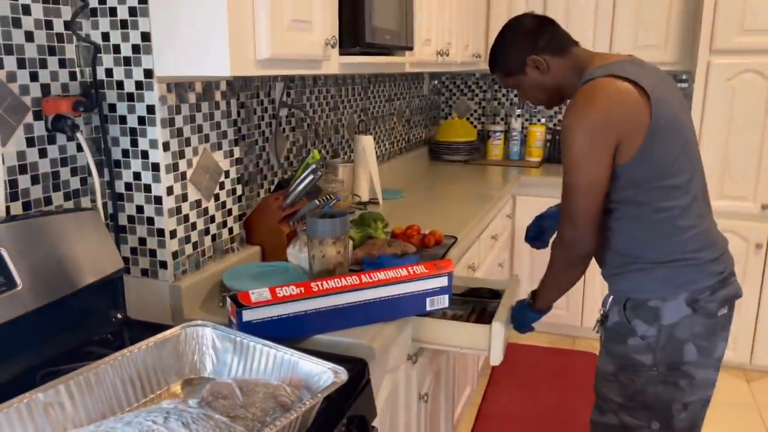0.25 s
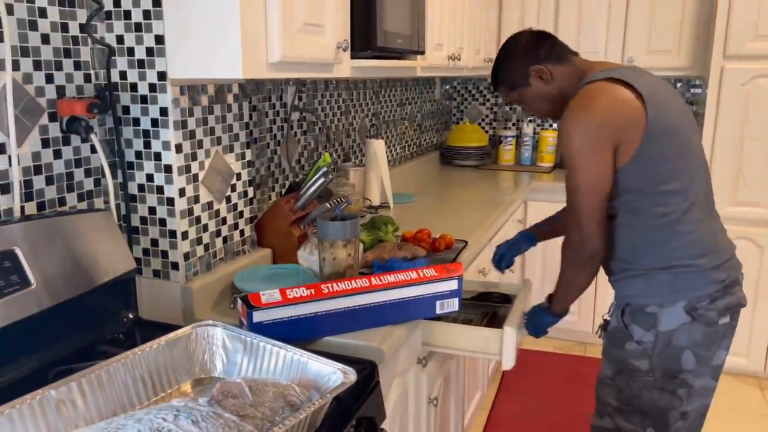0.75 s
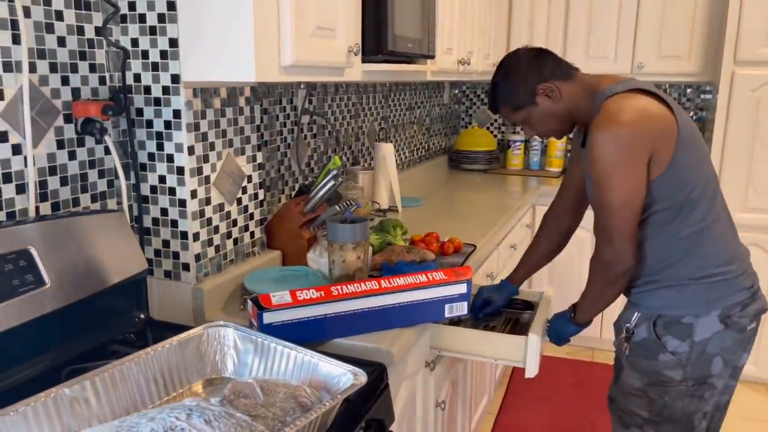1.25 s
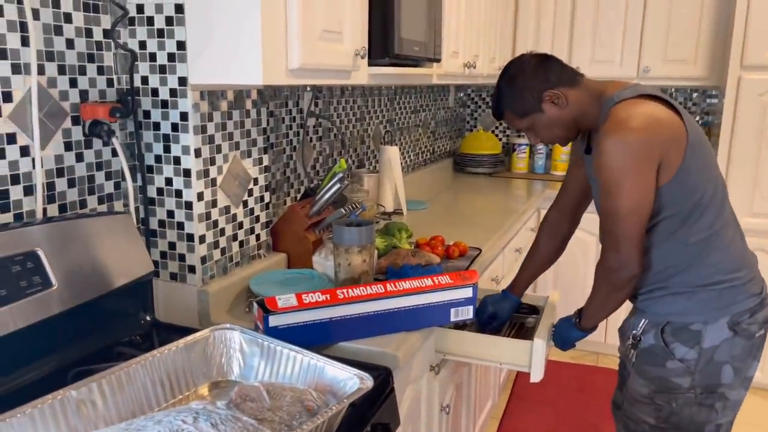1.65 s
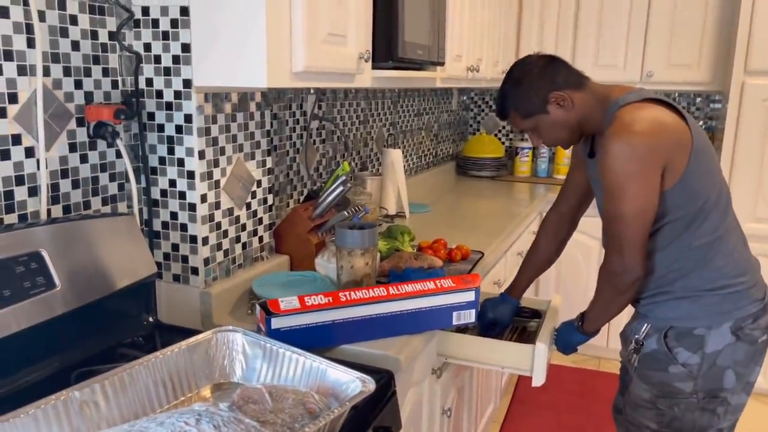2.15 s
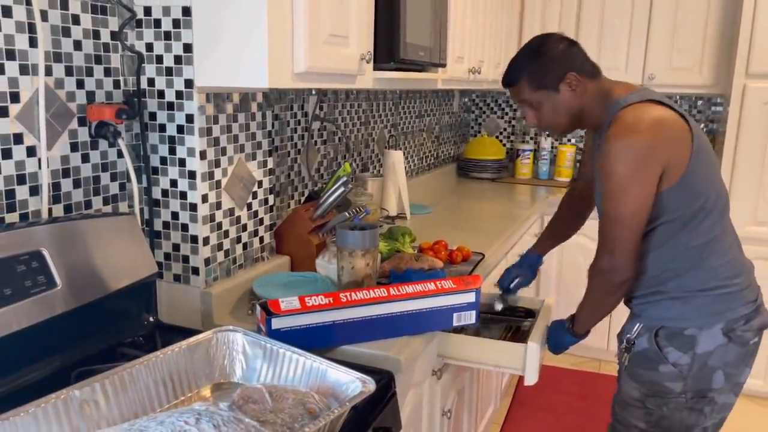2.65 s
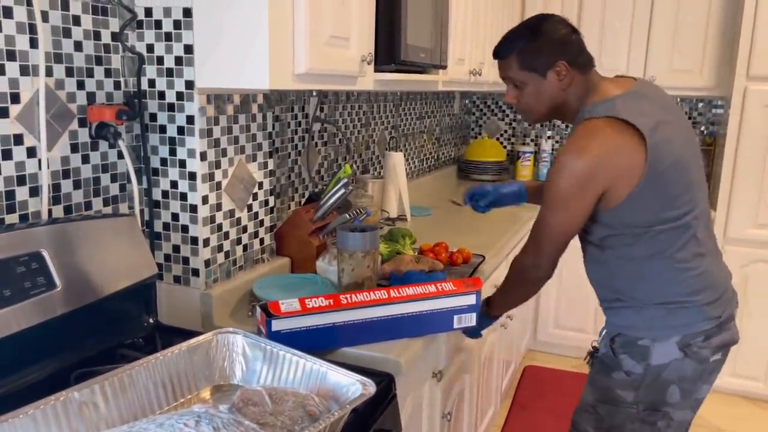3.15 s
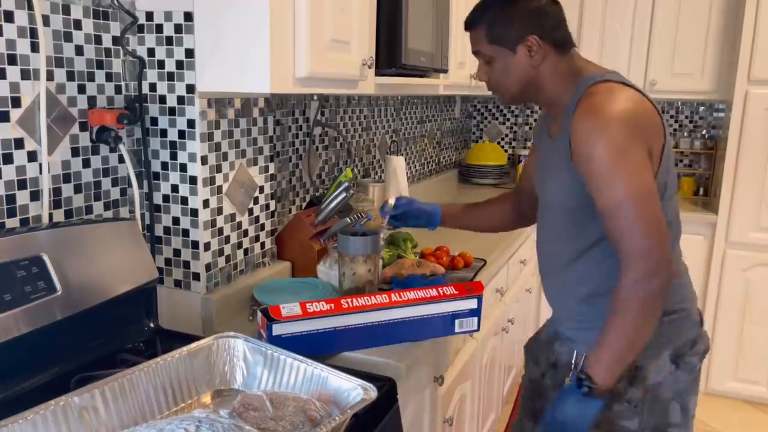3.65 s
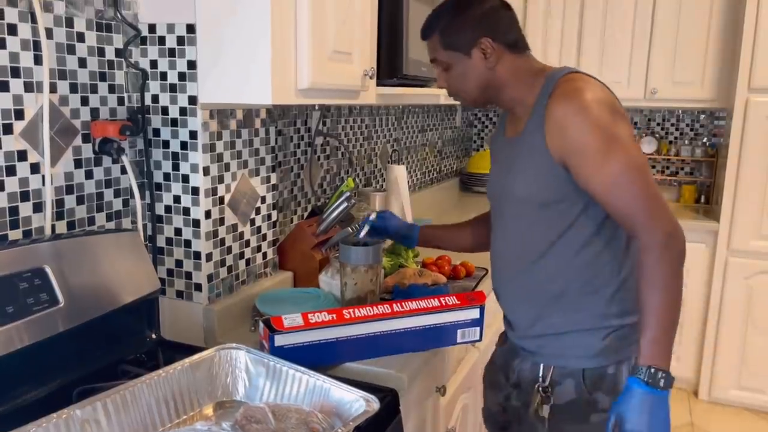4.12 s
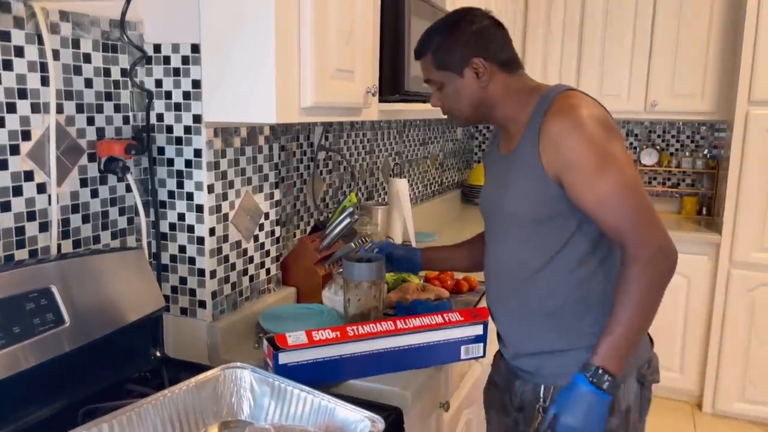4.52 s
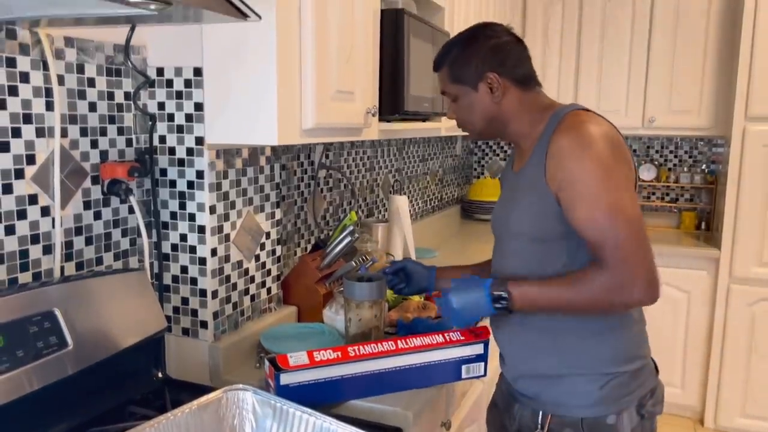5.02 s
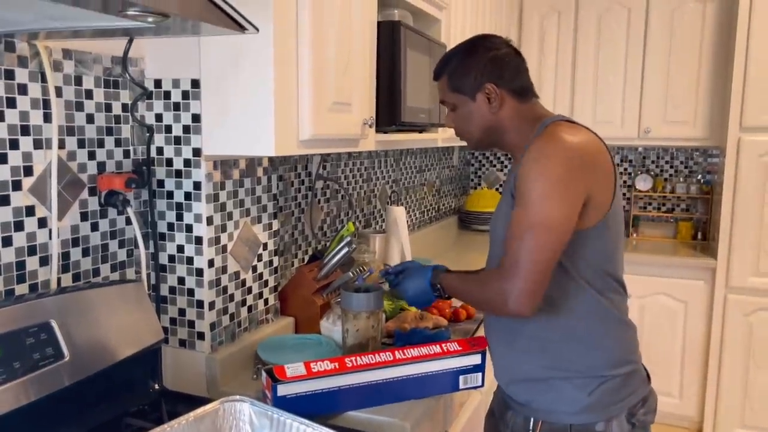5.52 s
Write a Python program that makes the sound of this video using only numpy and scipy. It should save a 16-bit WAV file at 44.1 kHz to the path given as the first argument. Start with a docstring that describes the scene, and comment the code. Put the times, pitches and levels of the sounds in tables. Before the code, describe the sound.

A wooden drawer opens, cutlery clinks, the drawer slams shut, and a spoon taps a jar in an echoing kitchen.

```python
"""A wooden cutlery drawer, heard from within a tiled kitchen on a closely spaced stereo microphone.
It is pulled open, wood rubbing on wood, and a gloved hand rummages through the clinking steel in its tray.
A spoon is drawn out ringing, the drawer rolls back and slams, then the spoon taps a blender jar's rim,
a little further left. Soft steps and rustling clothes follow. The tiles echo; an appliance hums."""
import sys
import numpy as np
from scipy import signal
from scipy.fft import rfft, irfft
from scipy.io import wavfile
from scipy.ndimage import uniform_filter1d

SR = 44100
rng = np.random.default_rng(int(sys.argv[2]) if len(sys.argv) > 2 else 0)


def put_to_file(sound):
    """Save the sound as 16-bit audio at rate SR, in the file named by the first command-line argument."""
    columns = np.atleast_2d(sound).T  # one column per channel
    safe = np.clip(columns, -1, 1)
    whole_steps = np.round(safe * 32767)
    wavfile.write(sys.argv[1], SR, whole_steps.astype(np.int16))


N = 254888
TIME = np.arange(N) / SR


def from_db(db):
    """Decibels to gain."""
    return 10 ** (np.asarray(db) / 20)


def rms_one(x):
    """Scale to unit rms."""
    return x / np.sqrt(np.mean(x ** 2) + 1e-20)


def at_hz(points, hz):
    """Read a table along a log-frequency axis."""
    f, value = np.transpose(points)
    return np.interp(np.log(np.maximum(hz, 1)), np.log(f), value)


def bins(x):
    """Frequencies of the spectrum of x."""
    return np.fft.rfftfreq(x.shape[-1], 1 / SR)


def coloured(x, spectrum):
    """Give a noise its colour, at unit rms."""
    return rms_one(irfft(rfft(x) * from_db(at_hz(spectrum, bins(x))), x.shape[-1]))


def with_cluster(spectrum, pitch_hz, height_db, width_hz):
    """A colour with one cluster of close modes standing out."""
    grid = np.geomspace(40, 20000, 500)
    return np.c_[grid, at_hz(spectrum, grid) + height_db / (1 + ((grid - pitch_hz) / width_hz) ** 2)]


def drift(per_s):
    """A random wander with a spread near 1."""
    return np.interp(TIME * per_s, np.arange(2000), rng.standard_normal(2000))


def swell(start_s, length_s, db, rise_db_per_s, fall_db_per_s):
    """Gain of one movement: it swells, holds its level and dies away."""
    early, late = np.maximum(start_s - TIME, 0), np.maximum(TIME - start_s - length_s, 0)
    return from_db(db - np.minimum(rise_db_per_s * early + fall_db_per_s * late, 120))


def add(track, s, sound, db):
    """Lay a sound into a track, scaled by the rms of its first 10 ms."""
    start = round(s * SR)
    head = np.sqrt(np.mean(sound[:SR // 100] ** 2))
    track[start:start + len(sound)] += (from_db(db) / head * sound)[:N - start]


def burst(spectrum, t60, rise_s=1e-6):
    """A blow on a body with countless close modes: a crack in its colour; a soft contact builds up."""
    t = TIME[:2 ** 14]
    first_half = t < t[-1] / 2
    attack = 1 - np.exp(-(t + 1 / SR) / rise_s)
    noise_spectrum = rfft(rng.standard_normal(len(t)) * from_db(-60 * t / t60))
    crack = irfft(noise_spectrum / np.abs(noise_spectrum)) * first_half * attack
    # minimum phase: nothing sounds before the blow
    cepstrum = irfft(np.log(from_db(at_hz(spectrum, bins(t)))))
    body = np.exp(rfft(cepstrum * np.sign(t) * 2 * first_half))
    return irfft(rfft(crack) * body)


def ring(hz, db, t60, size=SR // 2):
    """A few distinct modes started by a blow, each of either sign."""
    t = TIME[:size, None]
    return (np.sin(2 * np.pi * hz * t) * from_db(db - 60 * t / t60)) @ rng.choice([-1, 1], len(hz))


# motor tones, centred between the channels: f/Hz, level/dB, waver/dB
MOTOR_TONES = [(45.8, -43, .5), (57.3, -50, .8), (91, -55, 1.5), (95, -56, 1.5), (181, -62.5, 2),
               (266, -59.5, 2), (271.5, -58, 2), (355, -71, 2), (415, -68, 3), (533, -72, 3), (799, -73, 3)]
def appliance(wander_rad=0.2):
    """Two nearly steady motor tones hum under wavering overtones."""
    out = np.zeros(N)
    for hz, db, waver_db in MOTOR_TONES:
        gain = np.sqrt(2) * from_db(db + waver_db * drift(3.71))
        phase = 2 * np.pi * (hz * TIME + rng.random()) + wander_rad * drift(3.52)
        out += gain * np.sin(phase)
    return out


# the cook shifts about at the counter: t/s, length/s, level/dB
RUSTLES = [(0, 1, -60.5), (2.01, 1.5, -63), (3.496, 2.16, -61)]
# colour of the cloth: f/Hz, level/dB
CLOTH = [(500, -33.5), (1800, 12), (3200, 1.5), (5000, 0.5), (9000, 2), (11300, 1.5), (12500, -71.5)]
def clothes(fade_db_per_s=17.5):
    """Cloth brushes on cloth: a faint, wide hiss that comes and goes."""
    moves = [swell(s, length, db, fade_db_per_s, fade_db_per_s) for s, length, db in RUSTLES]
    return np.max(moves, axis=0) * coloured(diffuse(N), CLOTH)


# colour of the air all round the microphone: f/Hz, level/dB
AIR = [(25, -25), (38, -13.5), (60, 1.5), (80, -3), (140, -4), (270, -8), (380, -15), (550, -16),
       (900, -22.5), (1900, -28.5), (3300, -39), (9000, -48.5), (11300, -60), (12500, -67.5)]
def room_tone(db=-45.5):
    """A low, steady rush of air."""
    return from_db(db) * coloured(diffuse(N), AIR)


# colour of the drawer's wood: f/Hz, level/dB
WOOD = [(60, -3.5), (150, -7), (240, -0.5), (330, 8), (480, -4), (900, -1.5), (1500, -5), (2100, -6),
        (3000, -14.5), (4200, -17.5), (5500, -19.5), (9000, -19.5), (15000, -62)]
# colour of the heaped cutlery: f/Hz, level/dB
STEEL = [(1000, -5.5), (3000, -6.5), (4400, -5), (6000, -5), (7500, -3), (9000, 6), (10000, -2),
         (11200, 6.5), (12000, -3), (12800, -18), (14500, -15), (15400, -32)]
# pulls, pushes and sweeps of the hand through the tray: t/s, length/s, wood level/dB, steel level/dB
STROKES = [(0.014, 0.022, -44, -48.5), (0.484, 0.033, -59, -60.5), (0.608, 0.052, -45, -45.5),
           (0.738, 0.12, -55, -59), (0.907, 0.095, -47.5, -46), (1.957, 0.048, -47.5, -47.5),
           (2.17, 0.046, -51, -55), (2.323, 0.14, -43, -38), (2.783, 0.083, -46, -55),
           (2.956, 0.13, -40, -50)]
def sliding(rise_db_per_s=247, stop_db_per_s=338):
    """Every stroke rubs wood on wood and drags the cutlery over itself."""
    wood = sum(swell(s, length, db, rise_db_per_s, stop_db_per_s) for s, length, db, _ in STROKES)
    steel = sum(swell(s, length, db, rise_db_per_s, stop_db_per_s) for s, length, _, db in STROKES)
    wood *= rubbing(WOOD, per_s=1800, uneven_db=1.0)
    steel *= rubbing(STEEL, per_s=870, uneven_db=-1.5)
    return wood + steel


def rubbing(spectrum, per_s, uneven_db):
    """Friction is a stream of tiny slips of wavering strength."""
    slips = (rng.random(N) < per_s / SR) * rng.standard_normal(N)
    return coloured(slips * from_db(uneven_db * drift(70)), spectrum)


# knocks from inside the drawer: t/s, level/dB, hollow resonance f/Hz, its height/dB, rise/s
KNOCKS = [(0.0194, -34.5, 1880, 6, .0003), (.025, -36, 1470, 16, .0003), (.366, -46, 1600, 7, .003),
          (.383, -49, 1450, 4, 0.0036), (.546, -45.5, 1500, 15, .0005), (.659, -49.5, 1000, 5, 0.0028),
          (.746, -49.5, 1300, 4, .004), (.886, -41, 2100, 5, .003), (.901, -46.5, 1700, 3, 0.0054),
          (1.715, -50.5, 1510, 6, 0.0052), (1.729, -53, 1300, 3, 0.0052), (1.994, -45.5, 1204, 7, .004),
          (2.335, -42.5, 850, 11, .004), (2.385, -42.5, 327, 5, .003), (2.403, -36.5, 1197, 4, .003),
          (2.427, -39, 1150, 6, .003), (2.645, -48.5, 1486, 6, .003), (2.672, -45, 1210, 5, .003),
          (2.690, -49.5, 1400, 4, .005), (3.048, -39, 1517, 4, 0.0059), (3.072, -41.5, 1300, 5, 0.0055)]
def drawer_knocks(t60=0.052, hollow_width_hz=160, rebound_s=0.028, rebound_db=-10.5):
    """Each knock sounds the hollow tray, which falls back once, softer."""
    out = np.zeros(N)
    for s, db, hz, hollow_db, rise_s in KNOCKS:
        hollow = with_cluster(WOOD, hz, hollow_db, hollow_width_hz)
        add(out, s, burst(hollow, t60, rise_s), db)
        add(out, s + rebound_s * rng.uniform(.85, 1.15), burst(WOOD, t60, rise_s), db + rebound_db)
    return out


# brief scrapes and swishes: t/s, length/s, level/dB, start f/Hz, end f/Hz, half width/Hz
SWISHES = [(.192, 0.0181, -44, 1420, 950, 220), (4.769, 0.06, -61.5, 2400, 2300, 200),
           (4.935, 0.08, -61, 9300, 8000, 700), (5.081, 0.085, -64, 6200, 5750, 450)]
def swishes(rasp_db=3):
    """Each scrape is a narrow, rasping band of noise that falls in pitch."""
    out = np.zeros(N)
    for s, length, db, start_hz, end_hz, width_hz in SWISHES:
        hz = np.interp(TIME, [s, s + length], [start_hz, end_hz])
        gain = swell(s, length, db, rise_db_per_s=800, fall_db_per_s=350)
        rasp = from_db(rasp_db * drift(120))
        band = signal.sosfilt(signal.butter(2, width_hz, fs=SR, output="sos"), rng.standard_normal(N))
        out += gain * rasp * rms_one(band * np.cos(2 * np.pi * np.cumsum(hz) / SR))
    return out


# steel touching steel down in the tray: t/s, level/dB, cluster f/Hz, its width/Hz
CLINKS = [(0.335, -45.5, 7000, 302), (.587, -55, 9300, 340), (0.618, -41, 8140, 340),
          (0.634, -40, 12000, 340), (.651, -44, 7400, 340), (.701, -44.5, 4220, 600),
          (.703, -46, 7160, 300), (0.708, -41, 9100, 340), (0.917, -44, 11700, 340),
          (0.971, -47, 8400, 342), (1.679, -52, 10600, 340), (1.954, -51, 11260, 340),
          (2.181, -44, 9200, 340), (2.293, -36, 11100, 340), (2.336, -30, 11070, 300),
          (2.396, -20, 9280, 220), (2.403, -21.5, 11130, 300), (2.422, -25, 11700, 300)]
def cutlery(crack_t60=0.03, stray_count=10, stray_db=-17, stray_t60=0.11):
    """Heaped pieces damp each other: a clink is a crack with a cluster of modes and a few stray tones."""
    out = np.zeros(N)
    for s, db, hz, width_hz in CLINKS:
        colour = with_cluster(STEEL, hz, height_db=18.0, width_hz=width_hz)
        add(out, s, burst(colour, crack_t60), db)
        stray_hz = rng.uniform(4220, 12600, stray_count)
        add(out, s, ring(stray_hz, at_hz(STEEL, stray_hz), stray_t60, size=SR // 4), db + stray_db)
    return out


# a utensil swings free, in plain sight of the microphone: t/s, level/dB
LIFTS = [(1.958, -56), (2.302, -48), (2.421, -31)]
# its modes: f/Hz, level/dB, t60/s
UTENSIL_MODES = [(3854, -15, .5), (5265, 4, .42), (7773, -1, .33), (8355, -4, .3), (10035, 10, .38),
                 (10770, 3, .35), (11250, 0, .33), (11950, 4, .3), (12590, -8, .2), (12750, -7, .2),
                 (14410, -10, .2), (14770, -13, .18)]
def lifted_utensil():
    """Clear of the heap, one piece rings with clean, long tones."""
    out = np.zeros(N)
    for s, db in LIFTS:
        add(out, s, ring(*np.transpose(UTENSIL_MODES)), db)
    return out


# the drawer meets its stop inside the cabinet: t/s, level/dB
SLAM_HITS = [(3.2472, -15), (3.2493, -18.5), (3.264, -24.5), (3.283, -25.5)]
# colour of the slam: f/Hz, level/dB
SLAM_COLOUR = [(35, -24), (60, -11.5), (130, 0), (200, -2), (280, 5), (385, 3), (540, 2), (700, -2),
               (950, -1.5), (1350, -1), (2200, -3.5), (4000, -9), (7000, -13.5), (11700, -12),
               (13500, -54.5)]
def drawer_slam(t60=0.016):
    """The drawer hits its stop and chatters in a quick run of cracks."""
    out = np.zeros(N)
    for s, db in SLAM_HITS:
        add(out, s, burst(SLAM_COLOUR, t60), db)
    return out


# tones that hang in the kitchen after the slam: f/Hz, level/dB, t60/s
SLAM_RING_MODES = [(56, 6, 1), (66, 2, .7), (92.2, -2, 1), (137.5, -4.5, 0.9), (251, 4, 0.45), (314, 2, .5),
                   (352, 1, .47), (387, 5, .5), (435, 3, 0.48), (523, 1, 0.43), (636, -5, .4),
                   (1321, 2, .45), (1385, 5, 0.3), (1845, 4, 0.32)]
def slam_ring(db=-25.0):
    """A low boom and woody ringing follow the slam's first hit."""
    out = np.zeros(N)
    add(out, SLAM_HITS[0][0], ring(*np.transpose(SLAM_RING_MODES)), db)
    return out


# taps on the jar, left of centre: t/s, ring level/dB, tick level/dB, tilt/(dB per octave), spot 0-1
JAR_TAPS = [(3.694, -25.5, -30.5, -2.5, 0.02), (3.700, -18.5, -31.5, 3.5, 0.12),
            (3.709, -18, -36.5, 4, 0.2), (3.780, -35, -52, -8, .9), (3.8048, -20, -34, 3.5, 0.7),
            (3.83, -54, -39, -11, 1), (3.9263, -36.5, -45, -7.5, 0.2), (4.155, -68, -54.5, 8, 1)]
# ringing tones of spoon and jar tapped together: f/Hz, level/dB at spot 0, level/dB at spot 1, t60/s
TAP_MODES = [(2145, -9, -18, .025), (2205, -9, -15, .025), (2266, -16, -14, .3), (2312, -11, -10, .21),
             (2450, -20, -21, .04), (2950, -17, -23, .05), (3540, -23, -28, .05), (4080, -22, -26, .04),
             (5394, -18, -20, .14), (5739, -15, -12, .08), (5900, -18, -16, .1), (6330, -22, -21, .1),
             (7822, -21, -15, .13), (8441, -7, -25, .08), (8511, -10, -25, .09), (8834, -20, -24, .1),
             (9230, -8, -20, .07), (9560, -19, -20, .1), (11050, -13, -13, .15), (11300, -4.5, -1, .18),
             (11345, -3.5, -9, .09), (11820, -17, -26, .14), (12400, -22, -34, .09), (14760, -17, -29, .11)]
# colour of the contact tick: f/Hz, level/dB
TICK = [(200, -5.5), (500, -2.5), (1500, -7.5), (2200, -6.5), (3000, 1), (3600, -19.5), (4100, -0.5),
        (4700, -6), (6000, -1), (7000, -5), (9300, 3.5), (12000, 4.5), (15500, -22)]
def spoon_on_jar(tick_t60=0.079, touch_s=0.013, free_share=0.14):
    """Steel on the rim: a tick, then modes that lose most of their swing while the two still touch."""
    out = np.zeros(N)
    hz, spot0_db, spot1_db, t60 = np.transpose(TAP_MODES)
    for s, ring_db, tick_db, tilt_db, spot in JAR_TAPS:
        modes_db = spot0_db + spot * (spot1_db - spot0_db)
        tones = ring(hz, modes_db + tilt_db * np.log2(hz / hz[0]), t60)
        damping = free_share + np.exp(-TIME[:len(tones)] / touch_s)
        add(out, s, tones * damping, ring_db)
        add(out, s, burst(TICK, tick_t60), tick_db)
    return out


# steps and shifts down on the kitchen floor: t/s, level/dB
STEPS = [(4.671, -40), (4.715, -58), (4.78, -45.5)]
# colour of a step: f/Hz, level/dB
FOOTFALL = [(50, -21), (140, -3), (320, 3.5), (500, -9.5), (1200, -25), (3000, -38), (9000, -62)]
def footsteps(t60=0.16):
    """A foot lands softly with a dull thud."""
    out = np.zeros(N)
    for s, db in STEPS:
        add(out, s, burst(FOOTFALL, t60), db)
    return out


# decay of the tiled room: f/Hz, t60/s
ROOM_DECAY = [(60, 0.93), (250, 0.82), (500, 0.62), (1000, 0.58), (4000, 0.49), (8000, 0.49), (12000, 0.34),
              (16000, 0.1)]
def kitchen(x, build_s=0.0007):
    """Dense echoes off tiles and cupboards, dying band by band."""
    t = TIME[:SR]
    noise = diffuse(SR)
    centres = np.log([hz for hz, _ in ROOM_DECAY])
    spectrum, log_hz, echoes = rfft(noise), np.log(bins(noise) + 1), 0
    for share, (_, t60) in zip(np.eye(len(ROOM_DECAY)), ROOM_DECAY):
        band = irfft(spectrum * np.interp(log_hz, centres, share), SR)
        echoes = echoes + band * from_db(-60 * t / t60)
    echoes = evened(echoes * (1 - np.exp(-t / build_s)))
    response = rms_one(echoes) / np.sqrt(echoes.shape[-1])
    return signal.fftconvolve(x[None], response, axes=1)[:, :N]


def evened(echoes, width_bins=31):
    """Level the echoes' spectrum so that no pitch is favoured; keep their first half."""
    spectrum = rfft(echoes)
    power = uniform_filter1d(np.abs(spectrum) ** 2, width_bins, axis=-1)
    return irfft(spectrum / np.sqrt(np.abs(power) + 1e-12))[:, :echoes.shape[-1] // 2]


# lag between the microphone's two ports: f/Hz, share of the lag
PORT_LAG = [(9800, 1), (10700, .45)]
def delayed(hz, lag_samples):
    """Phase of the right port against the left: it lags a little, less in the top treble."""
    return np.exp(-2j * np.pi * hz / SR * lag_samples * at_hz(PORT_LAG, hz))


# likeness of the room's sound at the two ports: f/Hz, correlation
PORT_LIKENESS = [(40, 0.97), (120, 0.89), (300, 0.55), (700, 0.0398), (2000, 0.33), (5000, 0.62),
                 (9000, 0.99), (12000, 0.35)]
def diffuse(size, lag_samples=1.0):
    """Noise from all sides, a touch earlier on the left: alike in the bass, least so in the middle."""
    white = rng.standard_normal((2, size))
    mid, side = rfft(white)
    alike = at_hz(PORT_LIKENESS, bins(white))
    ports = np.sqrt(1 + alike) * mid + np.sqrt(1 - alike) * side * [[1], [-1]]
    return irfft(ports * delayed(bins(white), lag_samples * np.array([[0], [1]])), size)


# lean of the direct sound towards the left port: f/Hz, share of the pan
LEFT_LEAN = [(300, .5), (2400, 0.83), (4400, 1.1), (8000, .25)]
def from_left(x, pan_db, lag_samples):
    """Direct sound reaches the left port sooner and louder, leaning most in the low treble."""
    lean = from_db(pan_db / 2 * at_hz(LEFT_LEAN, bins(x)))
    return irfft(rfft(x) * np.array([lean, delayed(bins(x), lag_samples) / lean]), N)


def scene():
    """Sounds inside the drawer arrive mostly by way of the room; pieces in the hand sound closer."""
    wood = drawer_knocks() + drawer_slam()
    handling = cutlery() + sliding() + swishes() + footsteps()
    tapped, lifted = spoon_on_jar(), lifted_utensil()
    at_drawer = from_db(-2) * wood + from_db(-3) * handling + slam_ring()
    direct = from_left(at_drawer, pan_db=2.0, lag_samples=1)
    direct += from_left(tapped + lifted, pan_db=6.0, lag_samples=0.73)
    # each place in the room has its own echoes
    echoes = from_db(1.5) * kitchen(wood) + from_db(-2) * kitchen(handling)
    echoes += kitchen(from_db(-0.5) * tapped + from_db(-12) * lifted)
    ambience = appliance() + clothes() + room_tone()
    return direct + (echoes + ambience) * from_db([[.35], [-.35]])


def record(dry):
    """The microphone drops the deepest bass, has two dips in the treble and cuts the very top."""
    low_cut_hz, high_cut_hz = 37, 15400
    x = signal.sosfilt(signal.butter(6, low_cut_hz, "high", fs=SR, output="sos"), dry)
    for hz, width_hz in [(10300, 500), (13600, 1200)]:
        dip = signal.iirnotch(hz, hz / width_hz, SR)
        x = signal.lfilter(*dip, signal.lfilter(*dip, x))
    return signal.sosfilt(signal.ellip(10, .1, 90, high_cut_hz, fs=SR, output="sos"), x)


dry = scene()
out = record(dry)
put_to_file(out)
```